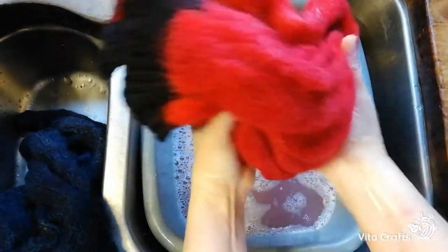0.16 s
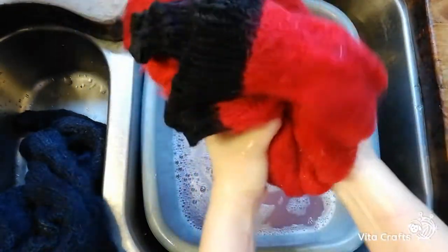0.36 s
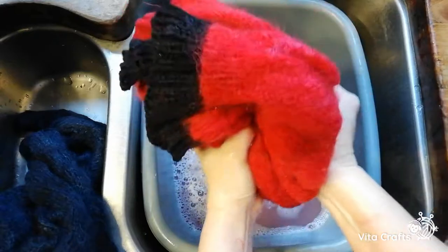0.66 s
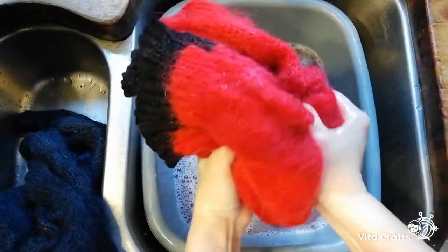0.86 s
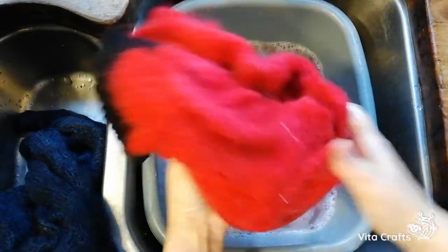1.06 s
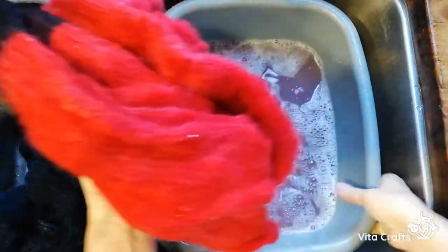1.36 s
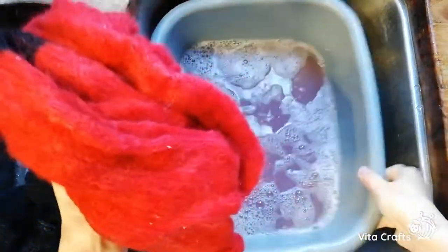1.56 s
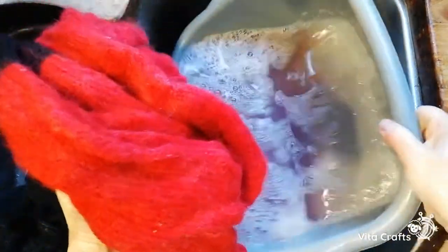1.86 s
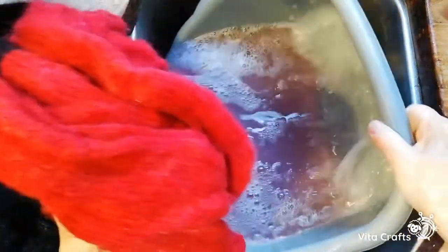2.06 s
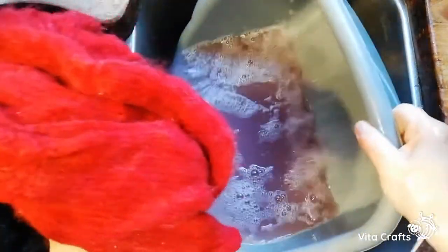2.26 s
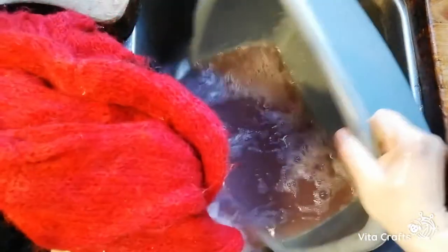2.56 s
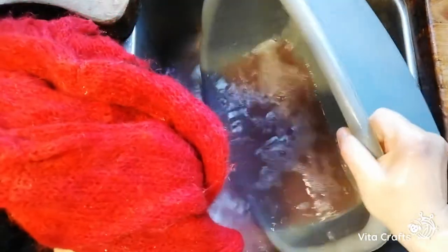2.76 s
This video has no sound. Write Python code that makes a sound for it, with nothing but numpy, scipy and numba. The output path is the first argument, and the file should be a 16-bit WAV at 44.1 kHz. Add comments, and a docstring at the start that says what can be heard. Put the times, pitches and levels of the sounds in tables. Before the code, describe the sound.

Close up in a small kitchen, foam crackles faintly, water spatters and drips brightly from wrung knitwear, then a tub drags with dull thuds and tips, splashing water into a booming metal sink.

```python
"""A wet knitted sweater is squeezed over a plastic basin in a steel sink: foam crackles and water dribbles,
as dense ringing grains on noise; drops are a tick, a splash and a bubble tone gliding up.
The basin slides (grains) and bumps (decaying modes, noise cracks), then tips: water spills in surges of grains.
The sink floor booms (noise in two resonances) under faint noise and hum.
Heard from close by in a small kitchen."""
import sys
import numpy as np
from scipy import signal
from scipy.fft import rfft, irfft
from scipy.io import wavfile
from numba import njit

SR = 44100
rng = np.random.default_rng(int(sys.argv[2]) if len(sys.argv) > 2 else 0)


def inscribe(sig):
    """Save sig as 16-bit PCM at rate SR to the path in sys.argv[1].

    A 1-D sig is mono; a 2-D sig holds one channel per row.
    Samples are clipped to [-1, 1] before scaling.
    """
    pcm = np.round(np.clip(np.atleast_2d(sig).T, -1, 1) * 32767)
    wavfile.write(sys.argv[1], SR, pcm.astype(np.int16))


N = 127890
TIME_S = np.arange(N) / SR

# Water running out of the wool. Each row: time in seconds, spatter in dB, bubbling in dB.
SQUEEZE_LEVELS = [(.436, -34, -45), (.485, -40, -55.5), (.497, -35, -36), (.6, -37.5, -44.5),
                  (.655, -35, -38.5), (.74, -36.5, -47.5), (.92, -43.5, -51), (1.17, -60.5, -74.5)]
# Foam crackling in the wool as the grip tightens. Each row: time in seconds, level in dB.
FOAM_LEVELS = [(0, -59), (.24, -52), (.285, -45.5), (.40, -52)]
# Single drops and the bubbles they trap. Each row: start in seconds, bubble level in dB, pitch in Hz.
DROPS = [(0.025, -31, 12900), (0.0251, -35, 5740), (0.211, -33, 5200), (0.279, -36, 1746),
         (.392, -30.5, 5700), (0.4056, -19.5, 7700), (0.41, -31, 2740), (.4474, -13, 6800),
         (0.45, -20, 2460), (0.4756, -21, 2590), (0.514, -20, 6320), (0.6273, -20.5, 3960),
         (.664, -33, 413), (0.7632, -26.5, 3450), (0.8853, -22, 6480), (0.9, -26, 2710),
         (1.033, -35.5, 2570), (1.063, -34, 1103), (1.078, -35.5, 12900), (1.117, -42, 3830),
         (1.926, -30, 1730), (2.119, -21, 2360), (2.239, -24.5, 1120), (2.262, -26.5, 1940),
         (2.293, -23.5, 1640), (2.3854, -25, 1072), (2.401, -26, 927), (2.6435, -14, 8400),
         (2.6518, -17, 1147), (2.7, -25, 1680), (2.864, -35.5, 363)]
# Basin dragged over the sink. Each row: time in seconds, rubbing hiss in dB, judder in dB.
SLIDE_LEVELS = [(1.228, -59, -64), (1.252, -43, -41), (1.30, -61, -54), (1.345, -47.5, -33.5),
                (1.42, -57.5, -58), (1.485, -43, -42), (1.69, -43, -48.5), (1.78, -55.5, -52.5),
                (1.9, -58.5, -69)]
# Basin bumping the sink or slapped by water. Each row: start in seconds, level before filtering in dB,
# pitch around which the contact pushes hardest in Hz.
KNOCKS = [(0.181, -46.5, 490), (1.3485, -27, 645), (1.479, -33.5, 216), (1.602, -34, 420),
          (1.704, -30, 265), (1.811, -26, 126), (1.94, -28, 645), (2.134, -25.5, 560), (2.458, -23, 282),
          (2.51, -23, 296)]
# Basin and sink ringing together. Each row: frequency in Hz, level in dB.
BASIN_MODES = [(116, -1.5), (245, -7), (328, -6), (470, -9), (740, -4)]
# Water tipping into the sink. Each row: start in seconds, rise in seconds, fall in seconds,
# spray in dB, splashing in dB, gurgling in dB.
SURGES = [(1.893, 0.044, 0.063, -36, -39.5, -38), (2.065, 0.031, 0.22, -34, -37, -44.5),
          (2.235, 0.0038, 0.17, -33.5, -37.5, -40.5), (2.379, 0.026, 0.27, -35, -37, -44),
          (2.441, 0.022, 0.15, -38, -34.5, -29.5), (2.528, 0.0017, 0.05, -27.5, -30.5, -31.5),
          (2.626, 0.0075, 0.12, -39.5, -35, -42.5)]
# Booming of the sink floor under basin and water. Each row: time in seconds, level in dB.
BOOM_LEVELS = [(.4, -58.5), (.66, -43.5), (1.15, -93), (1.27, -45), (1.86, -44.5), (2.12, -56), (2.39, -49),
               (2.47, -31), (2.75, -51)]
# Spectra of the noises. Each row: frequency in Hz, density in dB per Hz (relative).
DRIBBLE_COLOUR = [(400, 2), (1500, 2), (2600, -4)]
FOAM_COLOUR = [(4000, -6), (8000, 0.5)]
SLIDE_COLOUR = [(200, 14), (480, 7), (900, -5.5), (2500, -13.5)]
POUR_COLOUR = [(150, -1.5), (250, 0.5), (850, -8.5)]
ROOM_TONE_COLOUR = [(55, 11.5), (600, -12.5), (1300, -46), (9000, -10)]
# Dull top shared by all these spectra. Each row: frequency in Hz, gain in dB.
TREBLE_LOSS = [(8400, -1), (11000, -11), (16000, -11.5)]
# Resonances and gaps of the sink's hollow. Each row: frequency in Hz, width in Hz, boost in dB.
HOLLOW = [(518, 117, 5.5), (605, 43, -13), (1163, 71, 2.5), (2720, 66, 3.5)]

MEAN_GRAIN_CYCLES, GRAIN_RISE = 5.2, 0.035
CLUMPS_PER_S, CLUMP_SPREAD_DB = 70, 2.5
DROP_CYCLES, DROP_RISE, DROP_ATTACK_CYCLES = 6.25, 0.032, 0.11
DROP_TICK_DB, DROP_SPLASH_DB, DROP_SPLASH_S = 3, -9.5, 0.004  # relative to the bubble, before filtering
MODE_T60_AT_150_HZ_S = 0.21
KNOCK_CRACK_DB, KNOCK_CRACK_S = 9, 0.006
ROOM_TONE_DB, HUM_HZ, HUM_PEAK_DB = -55.5, 51.1, -53
ECHO_DB, ECHO_T60_S = -3.5, 0.044
ROOM_DB, ROOM_T60_S = -9, 0.47
TAIL_TOP_HZ, CUTOFF_HZ = 8850, 15900


def squeezed_wool():
    """Foam crackles, then threads of water spatter and bubble in the basin."""
    spatter, bubbling = gains(SQUEEZE_LEVELS)
    foam, = gains(FOAM_LEVELS)
    return (foam * grains(FOAM_COLOUR, 240.6, CUTOFF_HZ, per_s=1200, spread_db=4.5, wash_db=1)
            + spatter * grains(DRIBBLE_COLOUR, 1674, CUTOFF_HZ, per_s=1300, spread_db=3, wash_db=-3.5)
            + bubbling * grains(DRIBBLE_COLOUR, 205, 1456, per_s=800, spread_db=1.0, wash_db=-10.5))


def drops():
    """Each drop lands with a tick and a small splash, and traps a bubble whose pitch rises as it dies."""
    out = np.zeros(N)
    t = TIME_S[:SR // 4]
    for start_s, db, hz in DROPS:
        age = t * hz / DROP_CYCLES
        glide_hz = hz * (1 + DROP_RISE * np.minimum(age, 2))
        phase = 2 * np.pi * np.cumsum(glide_hz) / SR
        attack = 1 - np.exp(-t * hz / DROP_ATTACK_CYCLES)
        bubble = np.sin(phase) * np.exp(-np.minimum(age, 20)) * attack
        tick = from_db(DROP_TICK_DB) * (t == 0)
        splash = from_db(DROP_SPLASH_DB) * burst(DROP_SPLASH_S)
        landing = filtered(tick + splash, [hz / 2, hz * 2], "band", order=1)
        add(out, start_s, from_db(db) * (bubble + landing))
    return out


def basin_slide():
    """The plastic basin rubs and judders over the steel in many small slips."""
    hiss, judder = gains(SLIDE_LEVELS)
    return (hiss * grains(SLIDE_COLOUR, 897, CUTOFF_HZ, per_s=5600, spread_db=-4.0, wash_db=4.5)
            + judder * grains(SLIDE_COLOUR, 200.7, 863, per_s=530, spread_db=3.5, wash_db=-19.5))


def basin_knocks():
    """Each bump rings the shared modes, high ones dying sooner, and adds a short noise crack."""
    out = np.zeros(N)
    t = TIME_S[:SR // 2]
    ringing = np.zeros(len(t))
    for k, (hz, level_db) in enumerate(BASIN_MODES):
        decay_db = 60 * t / MODE_T60_AT_150_HZ_S * (hz / 150) ** .7
        ringing += (-1) ** k * from_db(level_db - decay_db) * np.sin(2 * np.pi * hz * t)
    for start_s, db, push_hz in KNOCKS:
        pushed = filtered(ringing, [push_hz / 2, push_hz * 2], "band")
        add(out, start_s, from_db(db) * pushed)
        crack = filtered(burst(KNOCK_CRACK_S), [250, 1900], "band")
        crack = filtered(crack, push_hz * 2, "low", order=1)
        add(out, start_s, from_db(db + KNOCK_CRACK_DB) * crack)
    return out


def pouring():
    """Each surge swells and drains away, as fine spray, splashing and deep gurgling."""
    power = np.zeros((3, N))
    for start_s, rise_s, fall_s, *levels_db in SURGES:
        rise = np.clip((TIME_S - start_s) / rise_s, 0, 1) ** 2
        fall = np.exp(-np.maximum(TIME_S - start_s - rise_s, 0) / fall_s)
        power += np.outer(from_db(levels_db), rise * fall) ** 2
    spray, splashing, gurgling = np.sqrt(power)
    return (spray * grains(POUR_COLOUR, 2690, CUTOFF_HZ, per_s=4600, spread_db=1.5, wash_db=-4.5)
            + splashing * grains(POUR_COLOUR, 680, 2944, per_s=800, spread_db=2, wash_db=-4)
            + gurgling * grains(POUR_COLOUR, 183.2, 670.6, per_s=600, spread_db=5.5, wash_db=-11.5))


def sink_boom():
    """The thin steel floor booms in its two lowest modes."""
    push, = gains(BOOM_LEVELS)
    shake = rng.standard_normal((2, N))
    lower = resonance(shake[0], 67.0, 31)
    upper = resonance(shake[1], 106.3, 23)
    return push * rms_one(lower + from_db(-6) * upper)


def room_tone():
    """Faint steady noise and a low hum."""
    hum = from_db(HUM_PEAK_DB) * np.sin(2 * np.pi * HUM_HZ * TIME_S)
    return from_db(ROOM_TONE_DB) * coloured_noise(ROOM_TONE_COLOUR) + hum


def reflections(x, t60_s, delay_s):
    """A dense, dulled tail of unit energy."""
    tail = rng.standard_normal(SR) * from_db(-60 * TIME_S[:SR] / t60_s)
    tail = filtered(tail, [150, TAIL_TOP_HZ], "band", order=1)
    tail = tail / np.sqrt(np.sum(tail ** 2))
    out = np.zeros(N)
    add(out, delay_s, signal.fftconvolve(x, tail)[:N])
    return out


def grains(colour, low_hz, high_hz, per_s, spread_db, wash_db):
    """Clumps of tiny bubbles or slips, each with its own pitch, size and ring, on a wash of noise; rms 1."""
    when, pitch, size, damping, sign = rng.random((40000, 5))[:int(per_s * N / SR)].T
    hz = low_hz * (min(high_hz, CUTOFF_HZ) / low_hz) ** pitch
    size_db = spread_db * np.minimum(-np.log(1 - size), 3.5)
    heights = from_db(size_db) * at_hz(colour, hz) * hz * np.sign(sign - .5)
    clump_gains = from_db(CLUMP_SPREAD_DB * rng.standard_normal(2000))
    heights = heights * clump_gains[(when * N / SR * CLUMPS_PER_S).astype(int)]
    cycles = MEAN_GRAIN_CYCLES * (.5 + damping)
    starts = (when * N).astype(np.int64)
    rings = ring_all(N, starts, 2 * np.pi * hz / SR, heights, cycles, GRAIN_RISE)
    rings = rms_one(filtered(rings, [low_hz, high_hz], "band"))
    wash = rms_one(filtered(coloured_noise(colour), [low_hz, high_hz], "band"))
    return rms_one(rings + from_db(wash_db) * wash)


@njit
def ring_all(size, starts, steps, heights, cycles, rise):
    """Sum of dying sines, each gliding upward; steps in radians per sample."""
    out = np.zeros(size)
    for k in range(len(starts)):
        life = cycles[k] * 2 * np.pi / steps[k]
        for i in range(min(int(6 * life), size - starts[k])):
            age = i / life
            out[starts[k] + i] += heights[k] * np.exp(-age) * np.sin(steps[k] * i * (1 + rise * age))
    return out


def coloured_noise(colour):
    """Noise of a given colour, rms 1."""
    hz = 1 + np.arange(N // 2 + 1) * SR / N  # 1 Hz up, to keep the logarithm finite
    return rms_one(irfft(rfft(rng.standard_normal(N)) * at_hz(colour, hz), N))


def at_hz(points, hz):
    """Gain of a colour at a frequency, with the treble loss."""
    total_db = 0
    for rows in (points, TREBLE_LOSS):
        row_hz, row_db = np.transpose(rows)
        total_db = total_db + np.interp(np.log(hz), np.log(row_hz), row_db)
    return from_db(total_db)


def burst(decay_s):
    """Noise that dies away."""
    return rng.standard_normal(SR // 4) * np.exp(-TIME_S[:SR // 4] / decay_s)


def resonance(x, hz, width_hz):
    """Two-pole resonance with gain 1 on top."""
    r = np.exp(-np.pi * width_hz / SR)
    zeros = np.array([1, 0, -1]) * (1 - r * r) / 2
    poles = [1, -2 * r * np.cos(2 * np.pi * hz / SR), r * r]
    return signal.lfilter(zeros, poles, x + 1e-18)


def filtered(x, hz, kind, order=2):
    """Butterworth filter."""
    sos = signal.butter(order, np.clip(hz, 10, .45 * SR), kind, fs=SR, output="sos")
    return signal.sosfilt(sos, x)


def gains(rows):
    """Level curves as gains; rapid fade-in before the first row, fast fade after the last."""
    row_s, *columns = np.transpose(rows)
    # 4000 dB per second before, 200 dB per second after
    outside_db = np.maximum(row_s[0] - TIME_S, 0) * 4000 + np.maximum(TIME_S - row_s[-1], 0) * 200
    return [from_db(np.interp(TIME_S, row_s, column) - outside_db) for column in columns]


def from_db(db):
    """Decibels to gain."""
    return 10 ** (np.asarray(db) / 20)


def rms_one(x):
    """Scale to unit power."""
    return x / np.sqrt(np.mean(x ** 2) + 1e-20)


def add(out, start_s, sound):
    """Mix a sound in at a time."""
    i = int(start_s * SR)
    out[i:i + len(sound)] += sound[:N - i]


def scene():
    """The treble of the drops echoes off the sink walls; hollow and kitchen colour all but boom and room tone."""
    hits = drops()
    echo = from_db(ECHO_DB) * reflections(filtered(hits, 2530, "high"), ECHO_T60_S, 0)
    x = squeezed_wool() + hits + echo + basin_slide() + basin_knocks() + pouring()
    for hz, width_hz, db in HOLLOW:
        x = x + (from_db(db) - 1) * resonance(x, hz, width_hz)
    x = x + from_db(ROOM_DB) * reflections(x, ROOM_T60_S, .008)
    return (x + sink_boom() + room_tone())[None]


def record(dry):
    """The top is cut steeply."""
    sos = signal.ellip(10, .3, 80, CUTOFF_HZ, fs=SR, output="sos")
    return signal.sosfilt(sos, dry)


dry = scene()
out = record(dry)
inscribe(out)
```